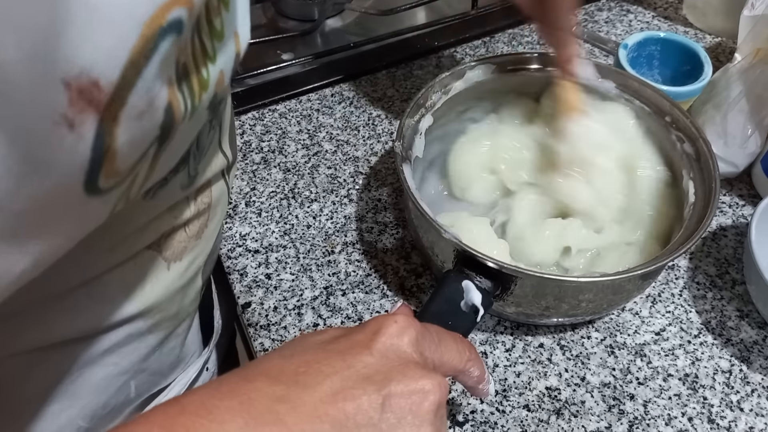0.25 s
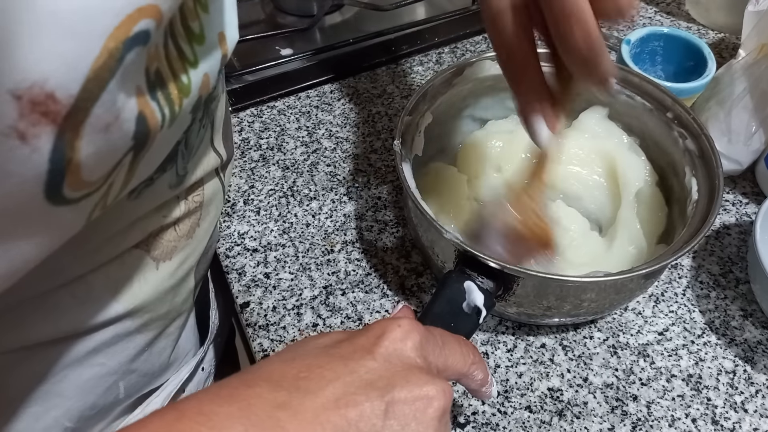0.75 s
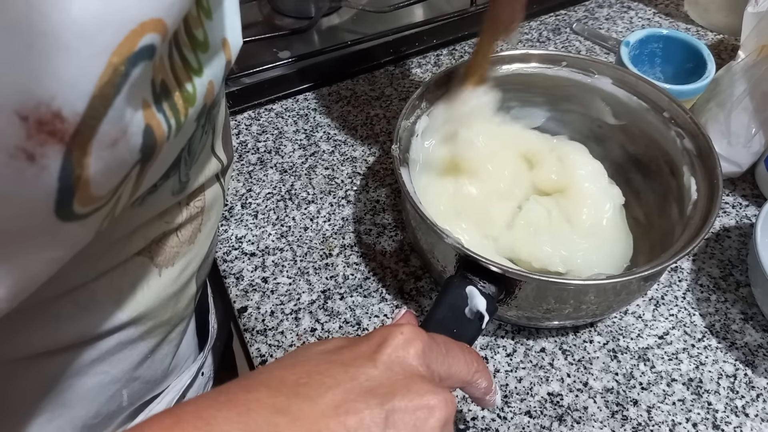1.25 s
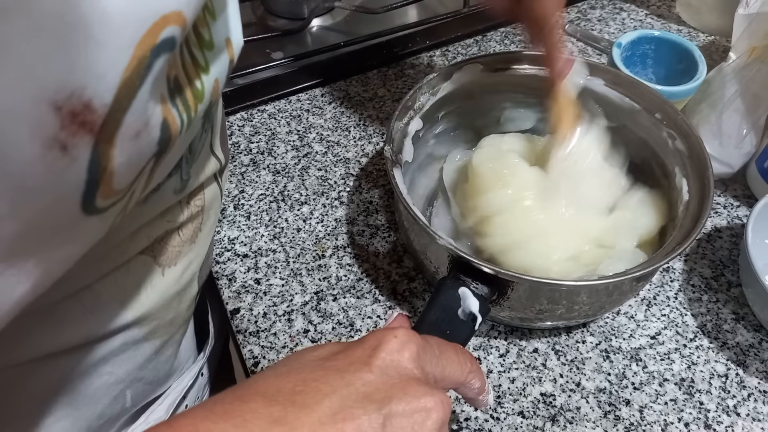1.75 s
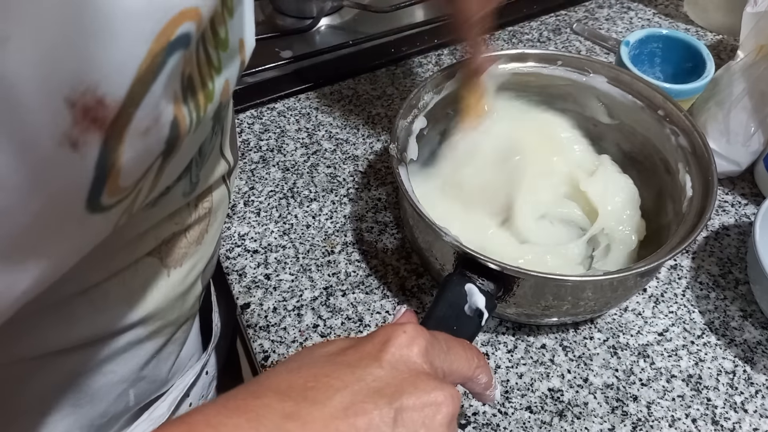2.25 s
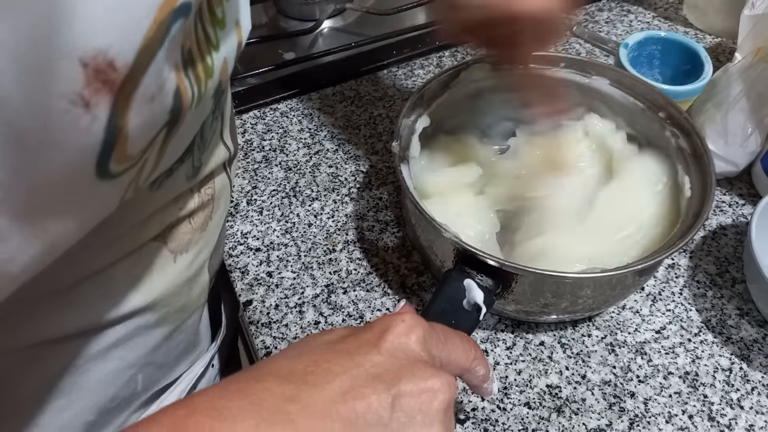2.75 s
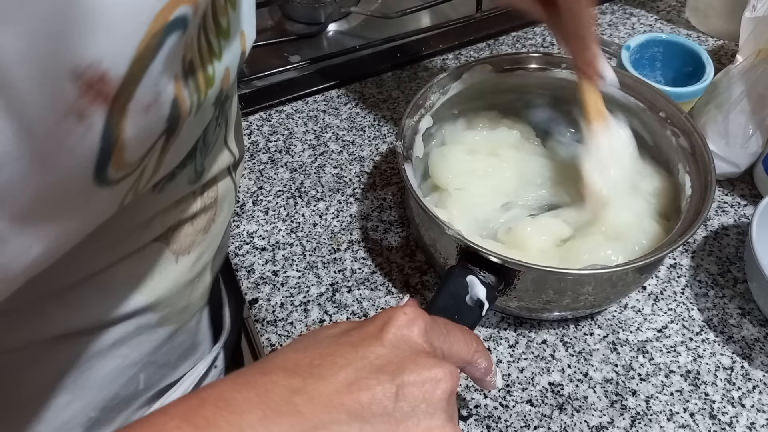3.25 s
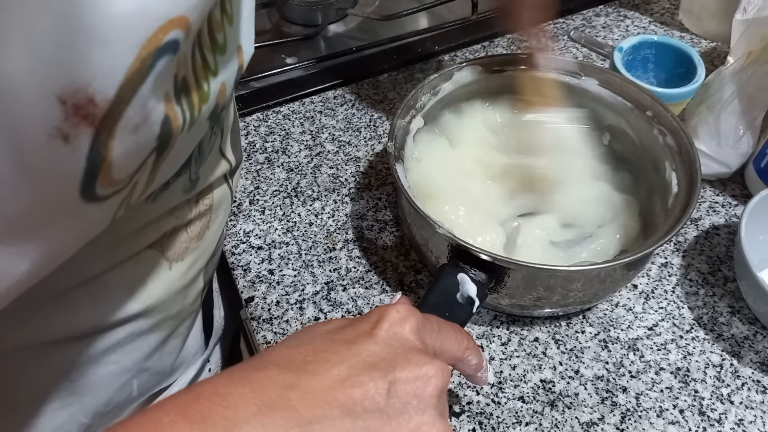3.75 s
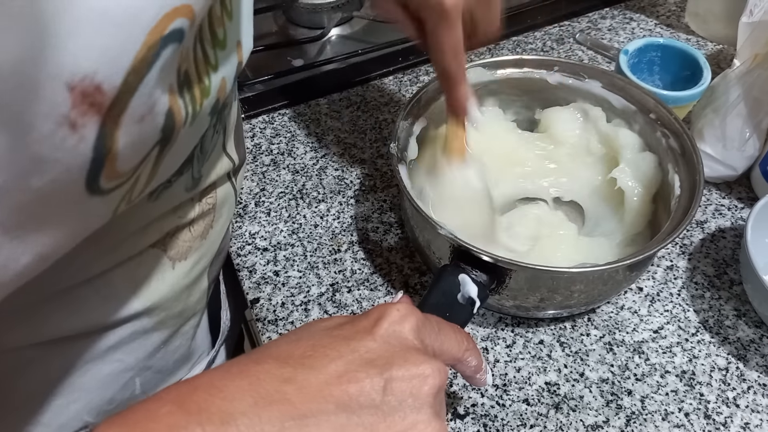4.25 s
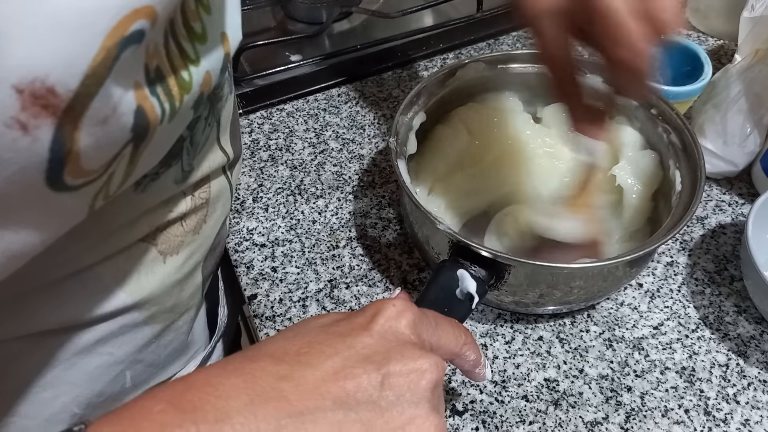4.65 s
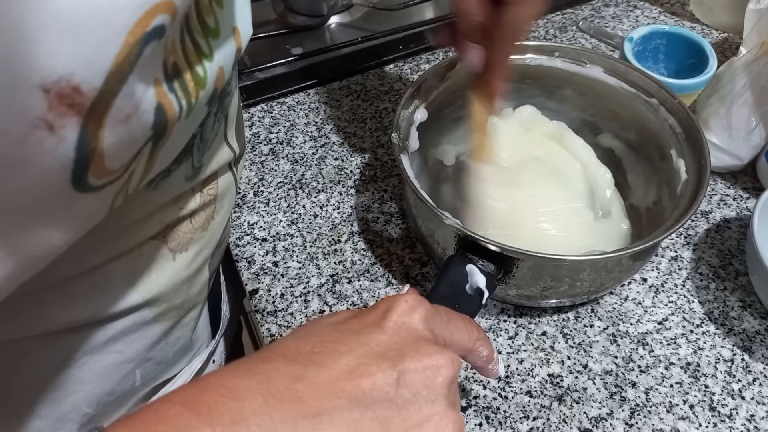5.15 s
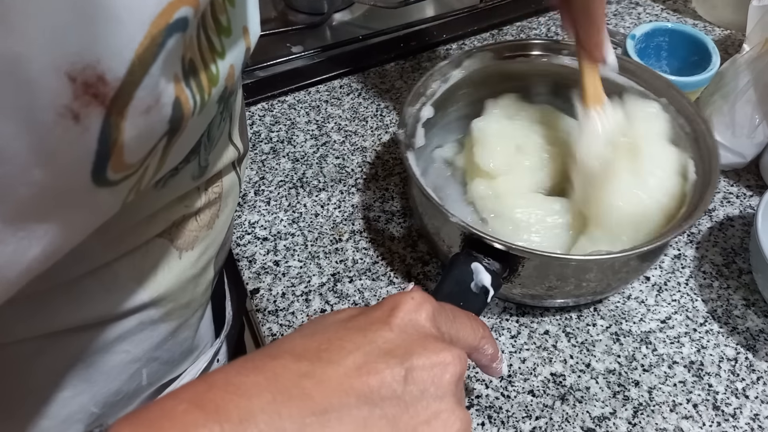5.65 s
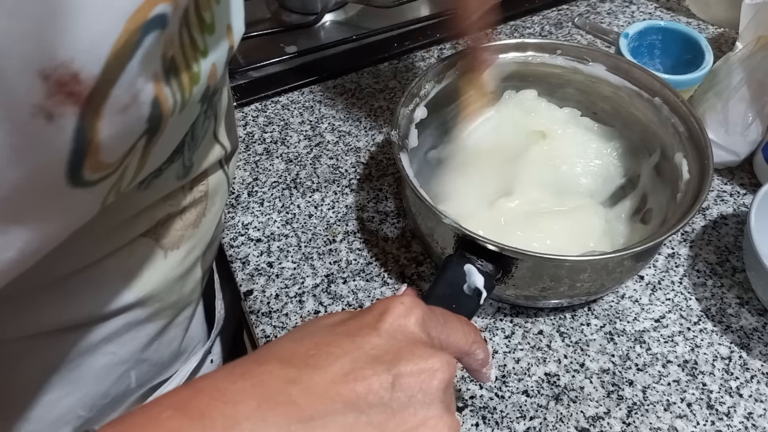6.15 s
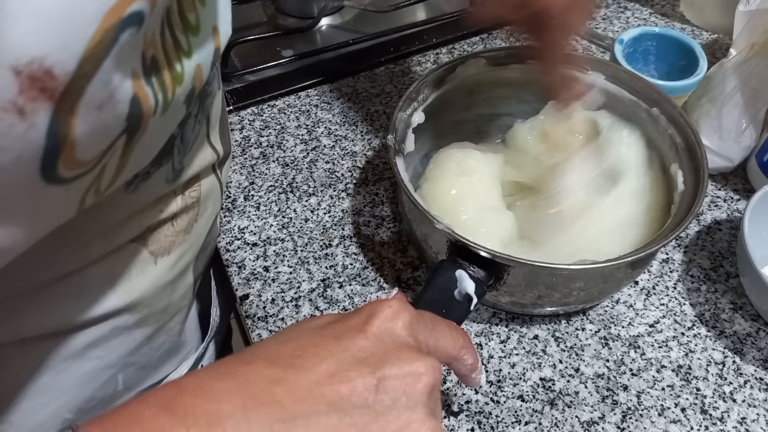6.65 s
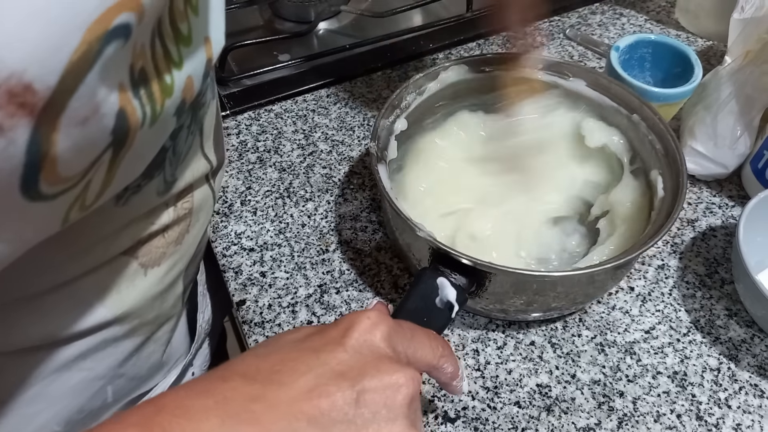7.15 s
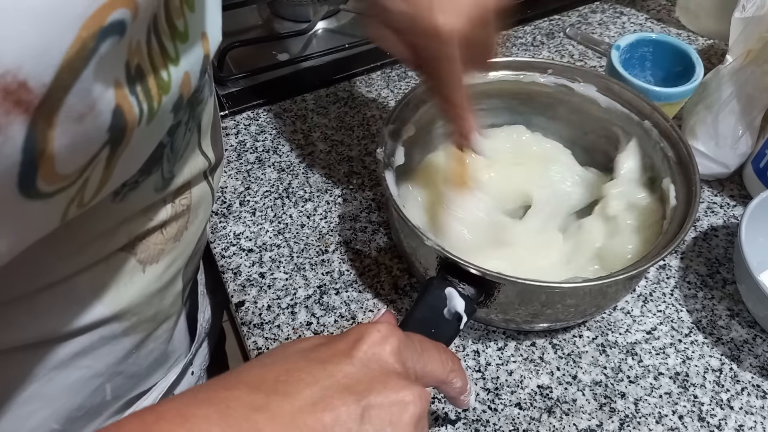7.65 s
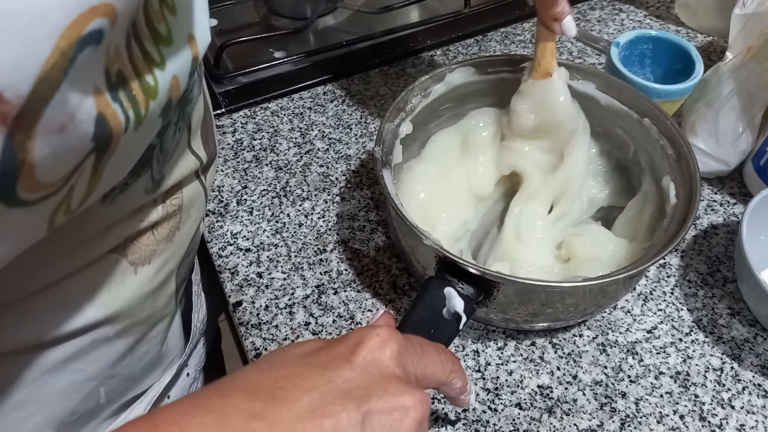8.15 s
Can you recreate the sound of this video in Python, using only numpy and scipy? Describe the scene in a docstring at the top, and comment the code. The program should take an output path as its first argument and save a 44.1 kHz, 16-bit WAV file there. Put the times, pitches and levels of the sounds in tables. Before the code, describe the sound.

A wooden spoon stirs thick paste in a steel pot, close to the microphone, for about eight and a half seconds. From the start there are irregular sticky clicks, small wet pops and a fine crackle as the paste pulls apart. A soft slop comes near 0.9 seconds, with fuller ones around 3.1, 3.5, 4 and 4.9 seconds, a sharp wet smack at 5.2 and a deep slop at 5.9. From 6 to 8 seconds the squelches and pops crowd together, busiest around 7.4 to 7.8, then thin out. Beneath them the spoon drags over the pot's bottom with a soft hiss and faint rubbing tones, clearest near 2 and 4.1 seconds. The pot nudges the counter with faint low rumbles. The hard kitchen adds a short echo, over a very faint steady hiss.

```python
"""A wooden spoon stirs thick paste in a steel pot on a stone kitchen counter, close to a two-port microphone.
Big air pockets slop, small ones pop, thin films snap, spit and fizz: all damped, gliding sines.
The spoon's scrape on the pot's floor and the pot's hum are shaped noise.
The hard kitchen answers every burst; a low rumble and a faint hiss lie underneath."""
import sys
import numpy as np
from scipy import signal
from scipy.fft import rfft, irfft, next_fast_len
from scipy.io import wavfile
from scipy.ndimage import map_coordinates

SR = 44100
rng = np.random.default_rng(int(sys.argv[2]) if len(sys.argv) > 2 else 0)


def dump(signal):
    """Clip the signal to [-1, 1] and save it as 16-bit WAV at the path in sys.argv[1]."""
    limited = np.clip(np.atleast_2d(signal).T, -1, 1)
    pcm = np.round(limited * 32767).astype(np.int16)
    wavfile.write(sys.argv[1], SR, pcm)


N = 369978

# Spoon shoves the pot against the counter. Each row: peak time in seconds, level in dB.
SHOVES = [(.96, -44.5), (2.33, -44.5), (2.55, -42.5), (2.83, -52.5), (3.74, -49), (4.06, -33), (5.24, -60),
          (5.7, -47.5), (5.96, -36.5), (6.26, -41.5), (6.82, -43.5), (7.19, -42.5), (7.48, -56),
          (7.62, -36.5)]
# Noise spectra. Each row: frequency in Hz, relative density in dB.
RUMBLE_SPECTRUM = [(25, -17.5), (50, -17), (80, 0), (105, 1), (140, -13), (250, -20), (600, -87.5)]
AIR_SPECTRUM = [(100, -19.5), (300, 11), (1000, -5), (2000, -11), (4000, -0.5), (6300, -25.5),
                (9000, -21.5), (16000, -2)]
SCRAPE_SPECTRUM = [(300, -12.5), (1500, -2), (3000, -8), (5000, -5), (6300, 8.5), (9000, -27.5),
                   (16000, -6)]
SWISH_SPECTRUM = [(500, -54), (1200, -22.5), (1600, 6), (2600, 10.5), (3500, 15.5), (4500, -2), (6000, -55)]
# Spoon drags over the pot's floor. Each row: time in seconds, hiss level in dB.
DRAG = [(0.0, -52), (0.4, -59.5), (0.86, -54.5), (1.03, -45), (1.25, -47.5), (1.72, -63), (1.86, -56),
        (2.03, -32), (2.45, -54), (3.06, -45.5), (3.36, -51.5), (3.53, -37.5), (3.81, -48.5), (4.11, -38.5),
        (4.27, -46), (4.47, -59), (4.76, -65.5), (4.91, -46.5), (5.61, -53), (5.88, -42), (6.15, -48.5),
        (6.66, -37.5), (6.9, -50), (7.2, -42.5), (7.5, -51.5), (7.85, -46), (8.1, -53.5), (8.39, -65.5)]
# Strokes that make the pot hum or squeak.
# Each row: start and end in seconds, start and end pitch in Hz, bandwidth in Hz, level in dB.
RUBS = [(0.028, 0.102, 1363, 1470, 250, -55), (0.5, 0.598, 4790, 4900, 150, -56),
        (0.658, 0.741, 3500, 3600, 90, -62.5), (0.682, 0.843, 5400, 5800, 60, -61.5),
        (0.709, 0.849, 1920, 2080, 40, -67.5), (0.887, 1.134, 5470, 5160, 497, -48.5),
        (0.941, 1.149, 1192, 1040, 262, -52.5), (1.237, 1.512, 4400, 4130, 300, -64),
        (1.246, 1.516, 1410, 1418, 380, -53.5), (1.784, 1.941, 6500, 6100, 500, -47.5),
        (1.808, 2.278, 541, 557, 190, -51.5), (3.48, 4.021, 1191, 1167, 155, -48),
        (3.509, 3.854, 618, 605, 202, -54.5), (4.079, 4.398, 556, 600, 200, -58.5),
        (4.08, 4.38, 6300, 5900, 500, -41.5), (5.02, 5.093, 398, 465, 151, -47.5),
        (5.074, 5.233, 1400, 1220, 302, -45.5), (5.085, 5.201, 4200, 4000, 500, -47.5),
        (5.539, 5.831, 1354, 1250, 250, -56), (6.643, 6.828, 1380, 1364, 250, -49.5)]
# Thinnest films spit. Each row: start in seconds, level after the ports in dB.
SPITS = [(0.0374, -28), (0.3027, -27), (0.4224, -36), (0.4658, -30), (0.525, -32.5), (0.6574, -32.5),
         (0.829, -29.5), (0.915, -37), (1.2012, -33), (1.4673, -17.5), (1.9512, -15.5), (2.1247, -24),
         (2.1899, -26), (2.3032, -29), (2.3531, -37), (2.5726, -26), (2.7427, -38), (2.9218, -17.5),
         (3.014, -28), (3.0689, -31), (3.0779, -36), (3.096, -23), (3.3257, -29.5), (3.458, -21.5),
         (3.5548, -22.5), (3.709, -26), (3.721, -21), (3.884, -28), (3.9235, -27.5), (3.9927, -24),
         (4.0553, -33), (4.118, -30), (4.1978, -23), (4.4518, -35), (4.4623, -28), (4.7236, -19),
         (4.869, -18.5), (4.8807, -13.5), (5.1043, -30), (5.2317, -19.5), (5.2448, -9), (5.3073, -34),
         (5.5081, -22.5), (5.5348, -26), (5.7064, -31), (5.7355, -19.5), (5.7814, -30.5), (6.0583, -28),
         (6.168, -28.5), (6.236, -30), (6.265, -31.5), (6.2937, -22.5), (6.3634, -25), (6.446, -39.5),
         (6.4597, -24.5), (6.634, -23), (6.6897, -19), (6.978, -24.5), (7.092, -27.5), (7.4076, -35),
         (7.5732, -28), (7.585, -19), (7.6594, -25), (7.717, -19), (7.9563, -23.5), (7.9953, -29),
         (8.168, -42), (8.2686, -33), (8.311, -33.5)]
# Air pockets burst.
# Each row: start in seconds, level in dB, pitch in Hz, left over right after the ports in dB.
POPS = [(0.0378, -34, 3160, 3), (0.0747, -29.5, 3400, -15), (0.2628, -31.5, 2900, -1), (0.62, -31, 1680, 2),
        (0.645, -46, 1650, 4), (0.8321, -13.5, 2730, -7), (0.9122, -15, 2530, -5),
        (1.017, -20.5, 3300, -4.0), (1.2241, -22, 2730, -1), (1.3244, -28.5, 1420, 5),
        (1.4673, -34, 1360, -1.0), (1.9504, -17.5, 2210, 2), (2.041, -38, 2000, -1),
        (2.0927, -21.5, 2760, 2), (2.359, -23.5, 2630, -12), (2.5326, -35, 1700, 5),
        (2.5743, -30, 2430, -4), (2.584, -17, 1690, 1), (2.6414, -25.5, 1680, 2), (2.715, -20, 2540, 1),
        (2.815, -22.5, 1650, -2), (2.9473, -20.5, 1840, -0.5), (2.977, -27, 1540, 7),
        (3.025, -37, 1650, 11), (3.0915, -27.5, 1790, -1), (3.1251, -11, 1425, 4), (3.238, -37, 2520, -18),
        (3.3184, -35.5, 995, -5), (3.3188, -31.5, 1590, 13), (3.459, -27, 1410, 10),
        (3.8858, -17, 3620, -10), (3.9926, -17, 1585, 6), (4.0108, -20.5, 1090, -3),
        (4.0813, -25, 1490, -1.0), (4.341, -33, 1580, 21.5), (4.3693, -25, 3560, -11),
        (4.8741, -34, 1020, 2.0), (5.105, -37, 3500, -9), (5.231, -17, 1720, 16), (5.2436, -8, 2810, 9),
        (5.253, -16, 2920, 6), (5.4643, -23, 3200, 7), (5.7096, -18.5, 2580, 9), (5.8038, -14.5, 2740, 5),
        (5.814, -13, 2720, -2.5), (5.8635, -14, 1254, 6), (5.9, -16.5, 3400, -12), (6.071, -35.5, 1640, 4),
        (6.129, -36, 1440, 12), (6.167, -19.5, 1500, 1.5), (6.1904, -16, 2250, -3), (6.4443, -30, 1670, 9),
        (6.4559, -16.5, 1480, -2.5), (6.5866, -25.5, 1390, -2), (6.743, -27, 1340, 3),
        (6.805, -27, 1480, 9), (6.8125, -11, 1017, 4), (6.8132, -17.5, 1435, 6.5), (7.043, -30, 3550, -2),
        (7.0556, -19, 3500, -6), (7.2604, -34, 1700, 7.5), (7.282, -24.5, 1556, 10.5), (7.382, -4, 1476, 3),
        (7.448, -14.5, 1347, 4.5), (7.5801, -17, 1550, 1), (7.593, -17.5, 1690, 9), (7.66, -22, 1430, 3),
        (7.6803, -5, 2730, -3.5), (7.7096, -16.5, 1350, 4), (7.7521, -10.5, 1390, 4.5),
        (7.8544, -22, 1500, 2), (7.95, -25.5, 1560, 14), (7.9837, -24.5, 1320, 7)]
# Paste films tear.
# Each row: start in seconds, level in dB, pitch in Hz, left over right after the ports in dB.
SNAPS = [(0.039, -13, 5960, -2), (0.2277, -32, 6350, -13), (0.2636, -26.5, 6500, -23),
         (0.3183, -18, 6030, 1), (0.4673, -17.5, 6370, -7), (0.509, -32, 6140, -9), (0.561, -28, 5600, -8),
         (0.5835, -13, 5740, -6.5), (0.643, -27, 6400, -3), (0.6612, -28, 6100, -16),
         (0.8303, -11.5, 5730, -5), (1.1403, -29, 6430, -8), (1.1902, -10.5, 6800, -1),
         (1.4676, -6, 6270, -4), (1.642, -17.5, 5600, -6), (1.72, -23, 6450, -14.5), (1.9504, -3, 5600, 2),
         (2.008, -36, 6350, 5), (2.033, -16.5, 6100, -7.5), (2.0517, -8, 5630, -2), (2.2013, -10, 7200, -2),
         (2.2236, -10.5, 5200, -6), (2.3032, -21, 5900, -10), (2.359, -21.5, 3800, -3),
         (2.4182, -14.5, 6800, -8), (2.428, -17, 6450, -5), (2.44, -24, 5400, -6), (2.462, -17, 6330, -5),
         (2.5179, -12.5, 6170, -3), (2.5715, -17.5, 6350, -9), (2.635, -23.5, 5860, -9),
         (2.6788, -30, 6260, -6), (2.712, -14, 6430, -1), (2.794, -27, 6600, -6), (2.828, -21.5, 5770, -2),
         (2.8825, -10.5, 6400, 1), (2.9196, -8.5, 6400, -4), (2.946, -11, 6640, -8), (3.015, -26, 6150, -1),
         (3.066, -20, 6300, -5), (3.097, -25, 5750, -1), (3.1118, -14.5, 5850, 1), (3.126, -17.5, 3820, -4),
         (3.143, -16.5, 6400, -5), (3.169, -22.5, 4240, -8.5), (3.204, -29.5, 5950, -14),
         (3.3, -17, 6000, -3), (3.345, -20, 5400, 0), (3.438, -17.5, 4250, -7), (3.456, -5, 6600, -0.5),
         (3.5178, -16, 6300, -13), (3.5573, -5.5, 5920, -11.5), (3.71, -7.5, 6870, -5.5),
         (3.7199, -5, 6000, 0), (3.8858, -16, 3150, -5.5), (3.921, -13.5, 6560, -9),
         (3.9593, -20, 6000, 3.5), (3.994, -8.5, 6930, -4), (4.073, -21.5, 4080, -9),
         (4.1437, -18, 6200, 2), (4.1598, -10, 6050, 0), (4.197, -18.5, 6340, -1.5),
         (4.369, -30, 3970, -11), (4.4625, -24, 6530, -14), (4.7222, -7, 5740, 3),
         (4.8759, -5, 5690, -19.5), (5.002, -19.5, 6700, -6), (5.019, -27.5, 6400, -13),
         (5.105, -18.5, 6350, -17), (5.229, -16, 6600, -6), (5.247, 0, 5880, 6),
         (5.467, -27.5, 3270, -15.5), (5.536, -21, 6800, -10), (5.7086, -9, 6140, -3.5),
         (5.7787, -16, 6300, 1.5), (5.803, -17, 6830, 2.5), (5.8062, -14, 5650, -8),
         (5.884, -22.5, 3960, -9), (6.0512, -28, 6050, -20), (6.155, -23, 6600, -14),
         (6.1669, -18.5, 4450, -4), (6.196, -13.5, 3700, -4.5), (6.2238, -19, 5070, -3.5),
         (6.2502, -18.5, 6720, -13), (6.297, -14.5, 6000, -4), (6.4553, -23, 4850, 10.5),
         (6.46, -9.5, 5470, -2), (6.498, -17.5, 5950, 4.5), (6.5215, -15, 6300, -24.5),
         (6.6281, -11, 4700, -4.5), (6.64, -12, 4800, -8), (6.7391, -17, 5440, -2),
         (6.7645, -17.5, 4800, -6), (6.777, -11.5, 6160, 4), (6.9129, -25.5, 5550, 9.5),
         (6.9107, -17.5, 6260, -12), (6.947, -27, 4130, -10), (6.979, -27, 6400, -15),
         (7.0433, -24, 6700, -12), (7.055, -12.5, 3740, -6.5), (7.1955, -15, 5960, -16),
         (7.242, -14, 5600, -4), (7.2781, -18, 6100, -7.5), (7.3934, -26, 6190, -4),
         (7.4142, -17.5, 5600, -3), (7.4619, -27, 6200, -13.5), (7.572, -15.5, 5250, -3.5),
         (7.5857, -9, 6700, -7), (7.6797, -5.5, 5170, -4), (7.7581, -18.5, 4420, -14.5),
         (7.8793, -29, 5700, -2.5), (7.8967, -12.5, 6400, -3.5), (7.9598, -15, 6270, 3),
         (8.2708, -35.5, 6540, -23), (8.296, -27.5, 6950, -13)]
# Lumps fall and close over air.
# Each row: start in seconds, level in dB, cavity pitch in Hz, gulp level in dB, crackle level in dB.
SLOPS = [(0.915, -25, 376, -34, -38), (2.584, -25.5, 770, -46, -31.5), (3.125, -16.5, 955, -56, -33),
         (3.214, -30.5, 990, -71, -60), (3.308, -39.5, 930, -63, -33.5), (3.431, -36, 463, -57, -39),
         (3.464, -18, 454, -28.5, -31.5), (3.988, -40, 540, -58, -36.5), (4.01, -12.5, 424, -31, -52),
         (4.352, -37, 910, -49.5, -39.5), (4.873, -12, 897, -54, -28.5), (5.187, -37.5, 605, -37.5, -40.5),
         (5.227, -14, 920, -32, -21.5), (5.249, -19.5, 450, -32, -24.5), (5.341, -28, 750, -44, -29),
         (5.863, -3.5, 478, -24.5, -41), (6.188, -15, 535, -26, -41), (6.41, -24.5, 420, -46.5, -42.5),
         (6.458, -23, 590, -50, -29), (6.488, -15, 480, -51, -55), (6.539, -23.5, 550, -51, -55),
         (6.811, -14, 536, -29.5, -25.5), (7.058, -27, 500, -54, -28.5), (7.137, -20, 437, -53, -50),
         (7.281, -14.5, 856, -51.5, -30), (7.379, -39, 910, -51, -25.5), (7.446, -15.5, 460, -41, -30.5),
         (7.592, -12, 460, -19.5, -20.5), (7.714, -11, 548, -24, -19), (7.759, -12.5, 470, -29, -20),
         (7.95, -13, 810, -36.5, -26.5)]
# Kitchen decay. Each row: frequency in Hz, time to fall 60 dB in seconds.
KITCHEN_T60 = [(100, 0.079), (400, 0.47), (1400, 0.46), (4000, 0.28), (10000, 0.23)]
# Kitchen tail against direct sound. Each row: frequency in Hz, gain in dB.
KITCHEN_GAIN = [(100, -3), (250, -2), (450, -5.5), (700, -6.5), (1500, -7), (3000, -3.5), (6000, -6.5),
                (12000, -8)]
# Microphone response. Each row: frequency in Hz, gain in dB.
MIC_GAIN = [(30, -15.5), (70, 3.5), (6900, 2), (7400, -11), (8100, -18), (11000, -13.5), (14000, -17),
            (15300, -0.5), (16000, -18.5), (16300, -42)]
# Port mismatch. Each row: frequency in Hz, left over right in dB.
PORT_BALANCE = [(60, 0), (200, -0.5), (380, 4.5), (700, 0), (1290, 2.0), (2380, -3.5), (4400, -1),
                (8120, -10), (15000, -7)]

CONTROL_HZ = 200  # rate of the shove and spray envelopes


def amp(db):
    return 10 ** (np.asarray(db) / 20)


def unit_rms(x):
    return x / np.sqrt(np.mean(np.abs(x) ** 2) + 1e-20)


def at_hz(points, hz):
    """Interpolate (Hz, value) points on a log axis."""
    knots_hz, values = np.transpose(points)
    return np.interp(np.log(hz + 1), np.log(knots_hz + 1), values)


def per_sample(t, values):
    return np.interp(np.arange(N) / SR, t, values)


def wobble(rate_hz):
    """Smooth random curve, rate_hz knots a second."""
    knots = rng.standard_normal(int(N * rate_hz / SR) + 4)
    return map_coordinates(knots, [np.arange(N) * rate_hz / SR])


def filtered(x, response):
    size = next_fast_len(N + 8192)
    return irfft(rfft(x, size) * response(np.fft.rfftfreq(size, 1 / SR)), size)[..., :N]


def stereo_noise(spectrum, shared):
    """Noise of rms 1, a share of its power common to both ports."""
    white = rng.standard_normal((3, N))
    pair = np.sqrt(shared) * white[0] + np.sqrt(1 - shared) * white[1:]
    return unit_rms(filtered(pair, lambda hz: amp(at_hz(spectrum, hz))))


def swells_db(events, t, rise_db_per_s, fall_db_per_s):
    """Power sum at times t of (s, dB) events that swell and die."""
    peak_s, db = np.transpose(events)
    age_s = t - peak_s[:, None]
    each_db = db[:, None] - np.where(age_s < 0, -rise_db_per_s * age_s, fall_db_per_s * age_s)
    return 10 * np.log10(np.sum(amp(2 * each_db), 0) + 1e-20)


def bubbles(start_s, db, hz, cycles, lag_s, glide, samples, pan_db=None):
    """Damped sines with soft onset and gliding pitch; the left port hears them lag_s late."""
    out = np.zeros((2, N + samples + 64))
    if pan_db is None:
        pan_db = rng.normal(0, 2.5, len(start_s))
    cycles = np.broadcast_to(cycles, start_s.shape)[:, None]
    index = np.clip(np.round(start_s * SR).astype(int), 0, N)[:, None] + np.arange(samples)
    for port, side in enumerate((.5, -.5)):
        age_cycles = np.maximum(index / SR - (start_s + side * lag_s)[:, None], 0) * hz[:, None]
        life = age_cycles / cycles
        onset = (1 - np.exp(-age_cycles / (0.22 + 0.15 * cycles))) ** 3
        tone = np.sin(2 * np.pi * age_cycles * (1 + glide * np.tanh(life)))
        rings = 4.3 * amp(db + side * pan_db)[:, None] * onset * np.exp(-2.8 * life) * tone
        out[port] = np.bincount(index.ravel(), rings.ravel(), out.shape[1])
    return out[:, :N]


def radiated(x, edge_hz):
    """Tiny sources radiate almost nothing below edge_hz."""
    return filtered(x, lambda hz: 1 / (1 + (edge_hz / (hz + 1)) ** 4))


def counter_rumble(floor_db=-60, sway_db=2.5):
    """The counter rumbles, louder under each shove of the pot."""
    t = np.arange(0, N / SR, 1 / CONTROL_HZ)
    shove = per_sample(t, amp(swells_db(SHOVES, t, rise_db_per_s=210, fall_db_per_s=173)))
    level = np.hypot(shove, amp(floor_db)) * amp(sway_db * wobble(9.4))
    return level * stereo_noise(RUMBLE_SPECTRUM, shared=0.65)


def air_hiss():
    """Faint, steady hiss of kitchen air."""
    return amp(-65.5) * stereo_noise(AIR_SPECTRUM, shared=0.27)


def scrape(sway_db=2, flutter_db=3.94, swish_gain_db=-22.5):
    """Wood on steel hisses; paste swishes round the spoon."""
    drag_db = per_sample(*np.transpose(DRAG))
    hiss_db = drag_db + sway_db * wobble(18) + flutter_db * wobble(60)
    hiss = amp(hiss_db) * stereo_noise(SCRAPE_SPECTRUM, shared=0.12)
    swish_db = drag_db + swish_gain_db + 2 * sway_db * wobble(15)
    return hiss + amp(swish_db) * stereo_noise(SWISH_SPECTRUM, shared=0.084)


def fizz(level_curve, centre_hz, log_spread, cycles, gain_db, count):
    """Small films tear at random times; their level clumps around a (seconds, dB) curve."""
    position = rng.random(count)
    pitch, size, bearing = rng.normal(0, 1, (count, 3)).T
    start_s = position * N / SR
    clump = (wobble(45) + 1.41 * wobble(4.2))[(position * N).astype(int)]
    db = np.interp(start_s, *level_curve) + gain_db + 5 * clump + 4 * size
    hz = np.clip(centre_hz * np.exp(log_spread * pitch), 1200, 16500)
    return bubbles(start_s, db, hz, cycles, lag_s=5e-5 + 5e-5 * bearing, glide=0.05, samples=180)


def spray():
    """Tiny films fizz loudly after each spit, softly while the spoon drags."""
    t = np.arange(0, N / SR, 1 / CONTROL_HZ)
    spit_db = swells_db(SPITS, t, rise_db_per_s=1700, fall_db_per_s=490) + 2.5
    drag_db = np.interp(t, *np.transpose(DRAG)) + 1.5
    level_curve = t, np.maximum(spit_db, drag_db)
    return fizz(level_curve, centre_hz=14360, log_spread=0.22, cycles=2.2, gain_db=7.5, count=1500)


def rubs():
    """Each stroke drives one pot resonance as narrow, gliding noise."""
    out = np.zeros((2, N))
    stick_slip = wobble(70)
    for start_s, end_s, start_hz, end_hz, width_hz, db in RUBS:
        first, n = round(start_s * SR), round((end_s - start_s) * SR)
        span = slice(first, first + n)
        pole = np.exp(-np.pi * width_hz / SR)
        baseband = signal.lfilter([1], [1, -2 * pole, pole ** 2], rng.standard_normal((3, 2, n)))
        phase = 2 * np.pi * np.cumsum(np.linspace(start_hz, end_hz, n)) / SR
        band = baseband[:, 0] * np.cos(phase) + baseband[:, 1] * np.sin(phase)
        chatter_db = width_hz / 120 * stick_slip[span]  # thin squeaks stay even
        envelope = amp(db + chatter_db) * np.sqrt(np.hanning(n))
        out[:, span] += envelope * unit_rms(band[0] + 1.06 * band[1:])
    return out


def spits(count=14):
    """Bursts of the tiniest bubbles, each over in a few milliseconds."""
    start_s, db = np.repeat(SPITS, count, axis=0).T
    pitch, delay, size, bearing = rng.normal(0, 1, (len(start_s), 4)).T
    hz = np.clip(14200 * np.exp(0.4 * pitch), 8000, 16200)
    share_db = -10 * np.log10(count) - at_hz(MIC_GAIN, hz).mean()
    return bubbles(start_s + 0.0029 * np.abs(delay), db + share_db + 1.2 * size, hz,
                   cycles=2.74, lag_s=5e-5 + 2e-5 * bearing, glide=0.0035, samples=100)


def pops(followers=4):
    """One bubble smacks; smaller ones of scattered pitch break just after it."""
    start_s, db, hz, heard_pan_db = np.transpose(POPS)
    scatter = rng.normal(0, 1, (len(start_s), 1 + 3 * followers)).T
    common = dict(lag_s=7e-5 + 2e-5 * scatter[0], samples=500,
                  pan_db=heard_pan_db - at_hz(PORT_BALANCE, hz))
    out = bubbles(start_s, db - 1, hz, cycles=POP_CYCLES, glide=0.014, **common)
    for delay, size, pitch in scatter[1:].reshape(followers, 3, -1):
        out += bubbles(start_s + 0.0025 * np.abs(delay), db - 10 + 0.4 * size, hz * np.exp(0.22 * pitch),
                       cycles=3.83, glide=0.12, **common)
    return out


def snaps(count=7):
    """A tearing film: one main bubble in a cluster of tiny ones; the weakest lead in and trail off."""
    start_s, db, hz, heard_pan_db = np.repeat(SNAPS, count, axis=0).T
    delay, bearing, size, pitch = rng.normal(0, 1, (len(start_s), 4)).T
    is_main = np.arange(len(start_s)) % count == 0
    offset_s = np.where(is_main, 0, 0.0008085 + 0.0035 * delay)
    gain_db = np.where(is_main, 0.8, -9 - 2200 * np.abs(offset_s) + 1.8 * size)
    bubble_hz = np.where(is_main, hz, hz * np.exp(0.2 * pitch))
    return bubbles(start_s + offset_s, db + gain_db, bubble_hz, cycles=np.where(is_main, 5.5, 7),
                   lag_s=5e-5 + 2e-5 * bearing, glide=0.039, samples=200,
                   pan_db=heard_pan_db - at_hz(PORT_BALANCE, hz))


def slops(crackles=30, cavity_cycles=3.03, lag_s=6e-5):
    """A closing cavity rings low, sucks down to deeper gurgles and trails crackle."""
    start_s, db, hz, gulp_db, crackle_db = np.transpose(SLOPS)
    size, pitch = rng.normal(0, 1, (len(start_s), 2)).T
    cavity = bubbles(start_s, db, hz, cavity_cycles, lag_s, glide=-0.029, samples=1500)
    overtone = bubbles(start_s + 0.00202, db - 5 + 4.5 * size, hz * (1.6 + 0.18 * pitch),
                       cavity_cycles, lag_s, glide=0.0062, samples=1500)
    gulp = bubbles(start_s + 0.00755, gulp_db, 1.02 * np.minimum(hz, 480),
                   cycles=5.3, lag_s=lag_s, glide=-0.45, samples=4000)

    wait, depth = rng.random((2, len(start_s), 4))
    gurgle_s = start_s[:, None] + 0.0115 + .06 * wait
    gurgle_db = gulp_db[:, None] - 3.5 - 9 * wait
    gurgle_hz = 330 - 90 * wait - 80 * depth
    gurgles = bubbles(gurgle_s.ravel(), gurgle_db.ravel(), gurgle_hz.ravel(),
                      cycles=2.66, lag_s=lag_s, glide=-0.26, samples=2500)

    delay_s = rng.exponential(0.024, (len(start_s), crackles))
    size, pitch = rng.normal(0, 1, (2, len(start_s), crackles))
    trail_db = crackle_db[:, None] - 120 * delay_s + 4 * size
    trail_hz = np.clip(2600 * np.exp(.6 * pitch), 500, 9000)
    trail = bubbles((start_s[:, None] + delay_s).ravel(), trail_db.ravel(), trail_hz.ravel(),
                    cycles=2.64, lag_s=5e-5, glide=0.014, samples=300)
    return cavity + overtone + gulp + gurgles + trail


def kitchen(x, block=16384, predelay_samples=150, near_wall_s=0.0062):
    """Wall reverb with one near echo; a fresh tail per block stands for the moving spoon and pot."""
    hz, t, _ = signal.stft(np.zeros(SR // 3), SR, nperseg=256)
    fade = amp(-60 * t / at_hz(KITCHEN_T60, hz)[:, None])
    fade *= np.tanh(t / 0.0013)  # build-up over the first walls
    fade *= (amp(at_hz(KITCHEN_GAIN, hz)) / np.sqrt(np.sum(fade ** 2, 1) * 128))[:, None]
    bass = signal.butter(1, 700, fs=SR, output="sos")
    out = np.zeros((2, N + SR))
    for first in range(0, N, block):
        noise = signal.stft(rng.standard_normal((3, SR // 3)), nperseg=256)[2]
        tail = signal.istft(noise * fade, nperseg=256)[1]
        tail = tail[1:] + signal.sosfilt(bass, tail[0] - tail[1:])  # long waves reach both ports alike
        tail[:, round(near_wall_s * SR)] += amp([-15, -13])
        wet = signal.fftconvolve(x[None, first:first + block], tail, axes=1)
        arrival = first + predelay_samples
        out[:, arrival:arrival + wet.shape[1]] += wet
    return out[:, :N]


def scene():
    """Paste with its reverb, plus dry spoon, pot and background noise."""
    drag = np.transpose(DRAG)
    mist = spray()
    # Paste peels off the moving spoon; froth breaks in the furrow.
    peel = fizz(drag, centre_hz=5800, log_spread=0.2, cycles=6.5, gain_db=-1.5, count=1200)
    froth = fizz(drag, centre_hz=2965, log_spread=0.39, cycles=5, gain_db=-4, count=500)
    paste = slops() + froth
    paste += radiated(pops(), edge_hz=630)
    paste += radiated(snaps() + peel, edge_hz=1700)
    paste += radiated(spits() + mist, edge_hz=7000)
    return paste + kitchen(paste.mean(0)) + scrape() + rubs() + counter_rumble() + air_hiss()


def record(dry, clip_level=0.93, top_hz=17100):
    """The ports dip above 7 kHz, peak near 15 kHz and differ a little; then clipping and a band limit."""
    sides = np.array([[.5], [-.5]])
    heard = filtered(dry, lambda hz: amp(at_hz(MIC_GAIN, hz) + sides * at_hz(PORT_BALANCE, hz)))
    return filtered(np.clip(heard, -clip_level, clip_level), lambda hz: hz < top_hz)


POP_CYCLES = 5.86
dry = scene()
out = record(dry)
dump(out)
```